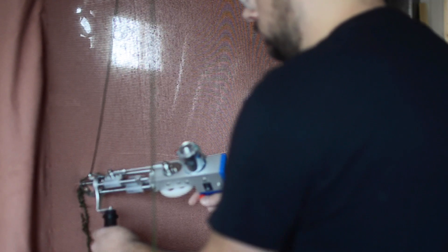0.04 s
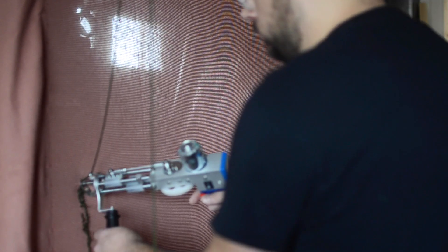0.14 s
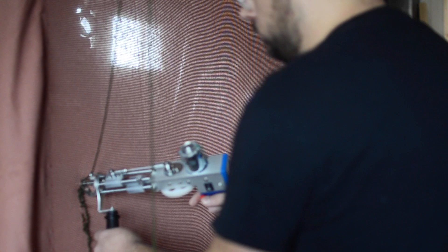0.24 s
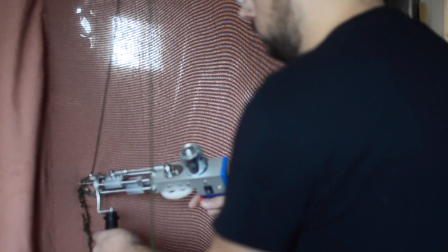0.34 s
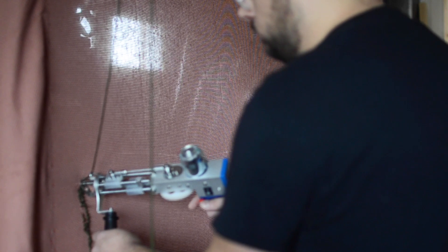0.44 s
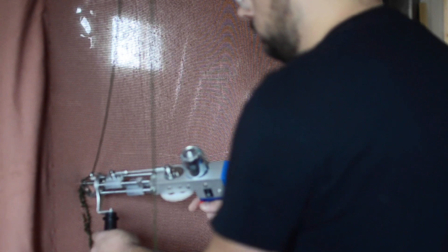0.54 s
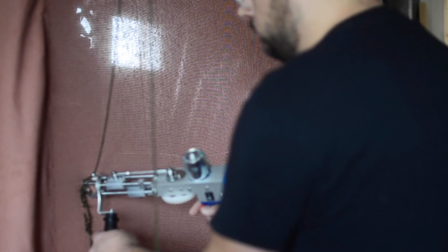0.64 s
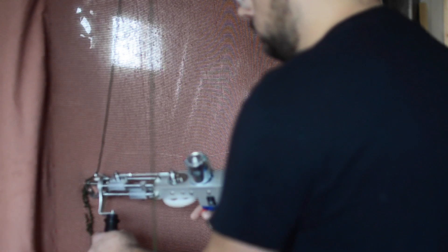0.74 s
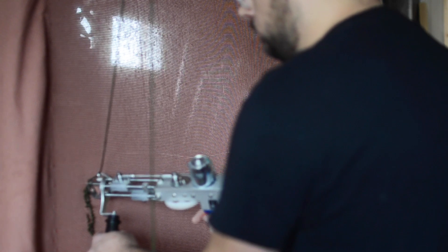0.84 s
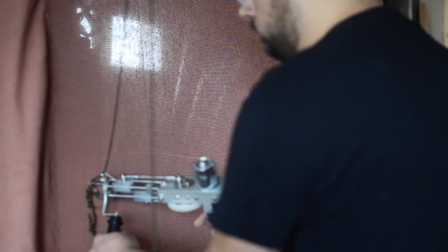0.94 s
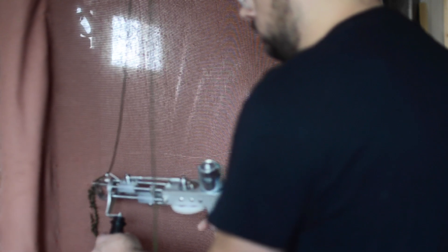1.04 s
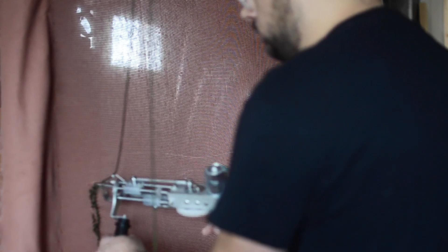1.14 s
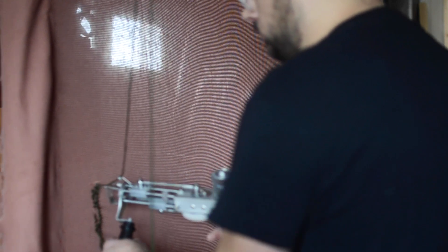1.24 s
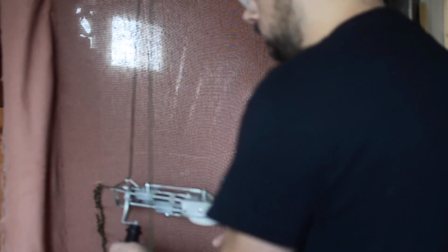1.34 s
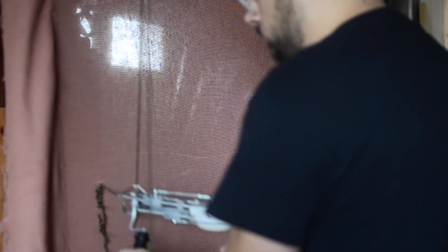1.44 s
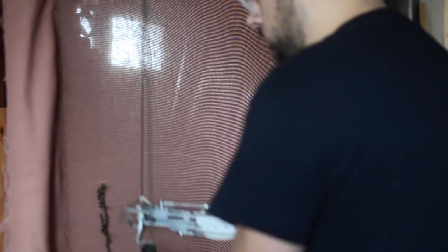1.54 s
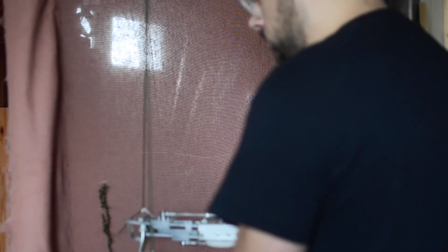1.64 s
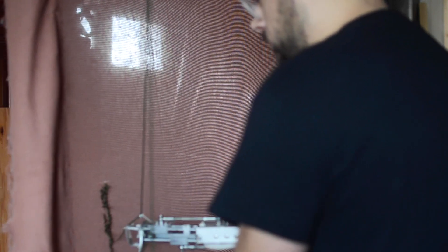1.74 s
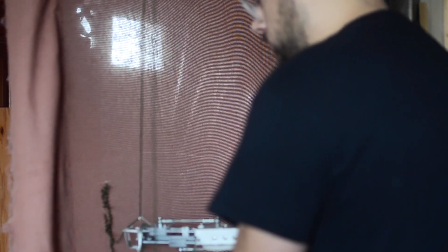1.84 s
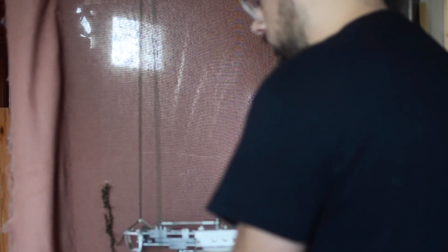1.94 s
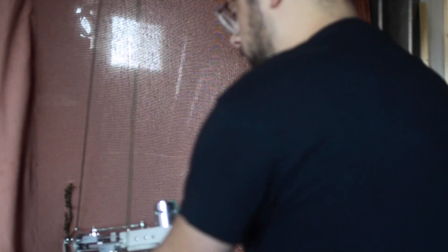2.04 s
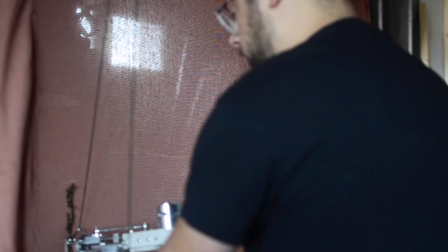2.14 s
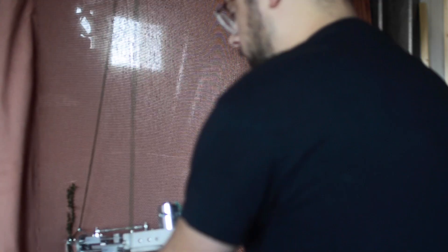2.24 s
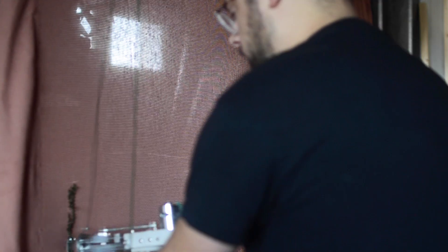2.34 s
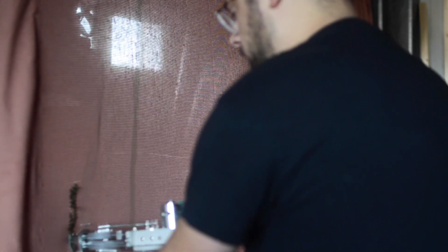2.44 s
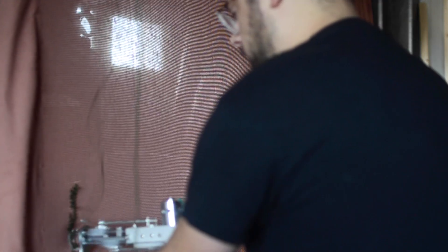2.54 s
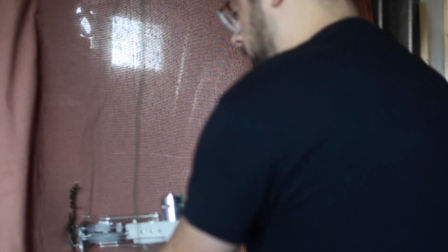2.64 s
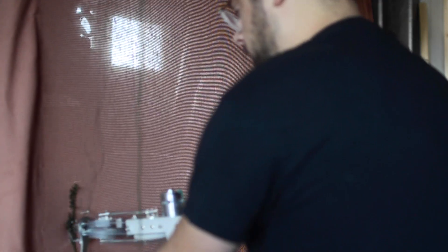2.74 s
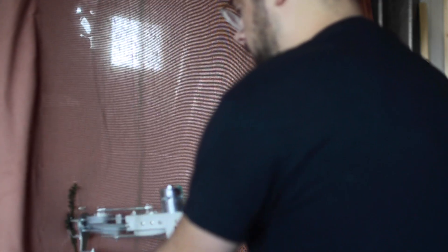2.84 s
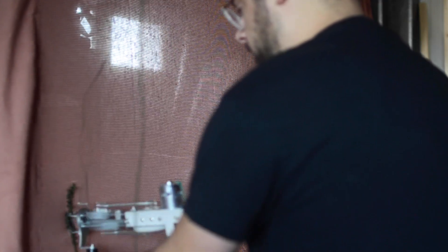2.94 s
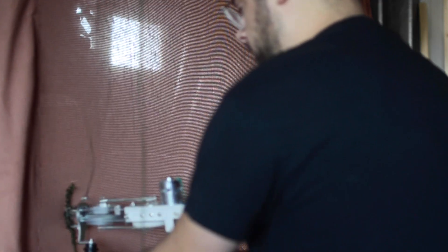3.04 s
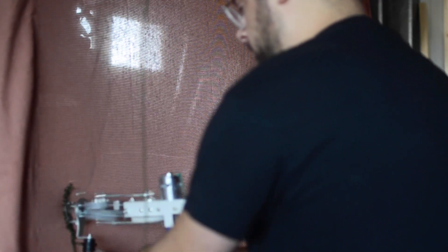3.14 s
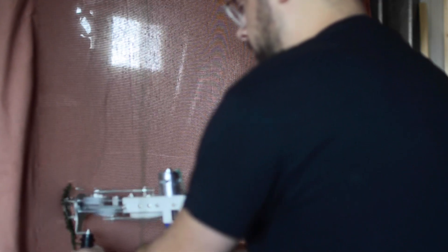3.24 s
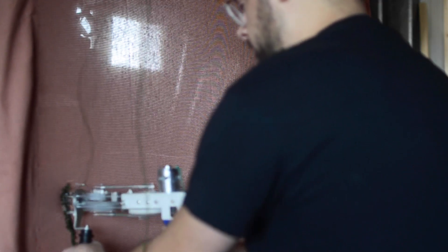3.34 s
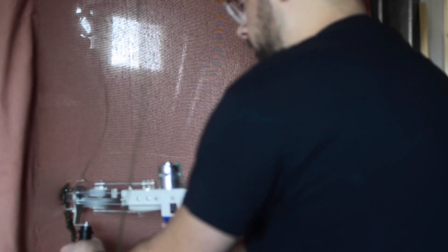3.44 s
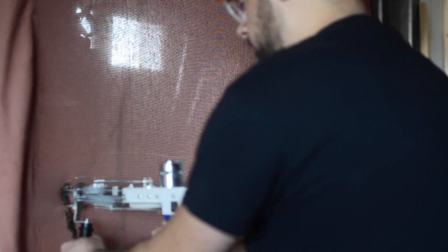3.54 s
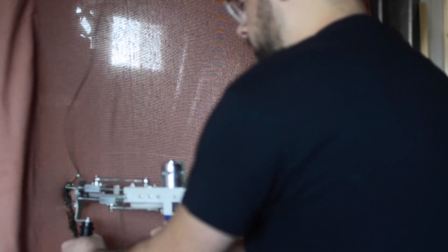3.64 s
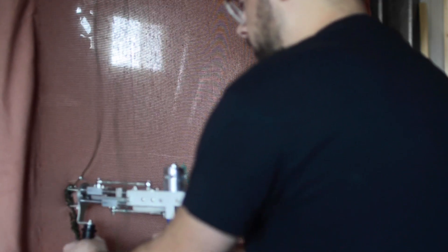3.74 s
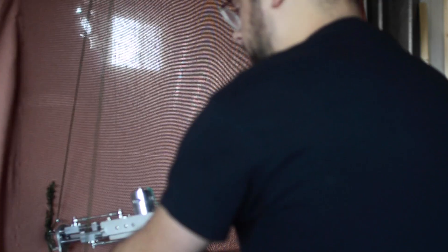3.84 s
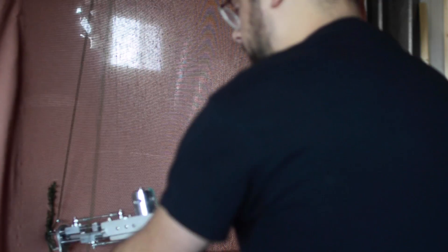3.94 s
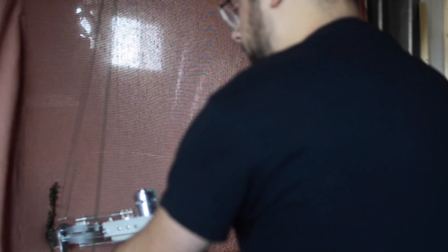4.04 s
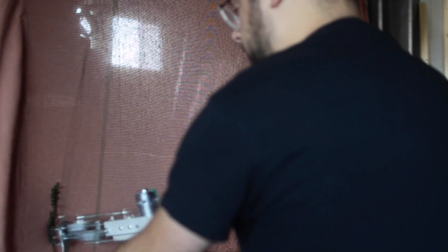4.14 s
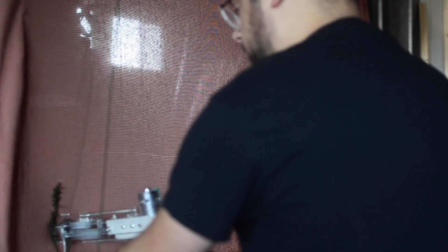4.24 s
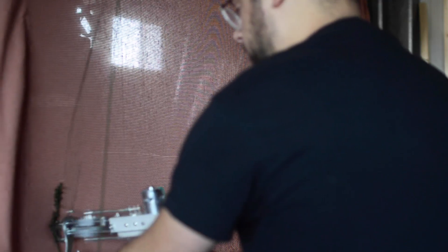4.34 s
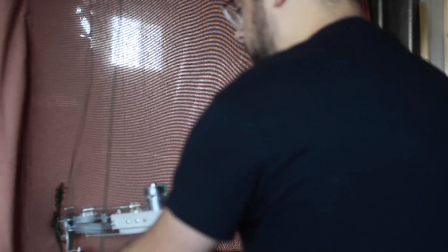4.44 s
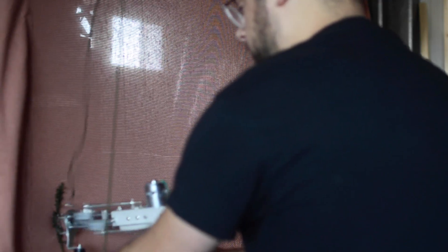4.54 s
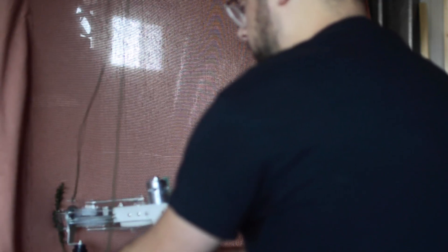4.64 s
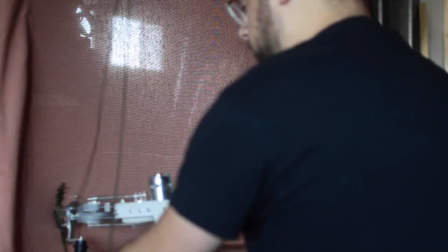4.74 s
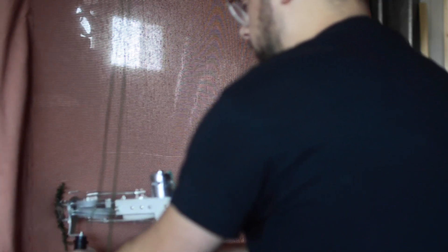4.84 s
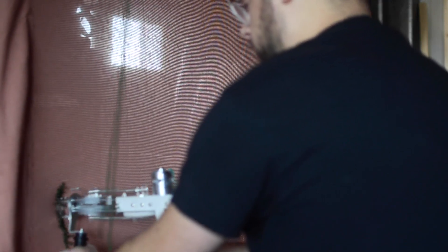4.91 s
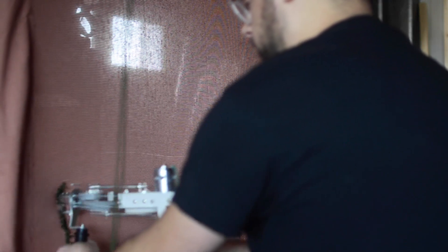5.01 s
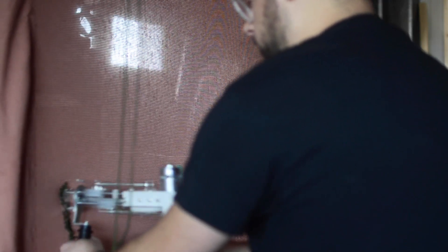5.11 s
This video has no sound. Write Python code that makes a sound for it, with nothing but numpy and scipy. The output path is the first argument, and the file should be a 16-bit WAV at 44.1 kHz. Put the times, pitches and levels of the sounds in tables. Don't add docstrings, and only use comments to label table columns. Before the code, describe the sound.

Quiet room tone with a very faint high electronic whistle. Light knocks, a thin rod ping and a dry click come first. Then a tufting gun starts instantly, chattering about seventeen times a second with bright metal snaps and low cloth thumps. It halts, the cloth settles softly, and a second similar burst follows, uncut at the end. Close, dry sound with short reflections.

```python
import sys
import numpy as np
from scipy import signal
from scipy.fft import rfft, irfft, next_fast_len
from scipy.io import wavfile

SR = 44100
rng = np.random.default_rng(int(sys.argv[2]) if len(sys.argv) > 2 else 0)


def voltage_ratio(decibels):
    exponent = np.asarray(decibels, float) / 20
    return 10 ** exponent


def wav_record(signal):
    frames = np.transpose(np.atleast_2d(signal))
    bounded = np.clip(frames, -1, 1)
    quanta = np.round(bounded * 32767).astype(np.int16)
    wavfile.write(sys.argv[1], SR, quanta)


N = 228155


def rms_one(x):
    return x / np.sqrt(np.mean(x ** 2) + 1e-20)


def in_time(rows):
    s, *columns = np.transpose(rows)
    return [np.interp(np.arange(N) / SR, s, c) for c in columns]


def colour(x, spectrum):
    hz, db = np.transpose(spectrum)
    log_hz = np.log(np.fft.rfftfreq(N, 1 / SR) + 1)
    return irfft(rfft(x) * voltage_ratio(np.interp(log_hz, np.log(hz), db)), N)


def drift(rate_hz):
    r = np.exp(-2 * np.pi * rate_hz / SR)
    wander = signal.lfilter([1], [1, -2 * r, r * r], rng.standard_normal(N + SR))
    return rms_one(wander[SR:])


def high_pass(x, hz):
    return signal.sosfilt(signal.butter(3, hz, "high", fs=SR, output="sos"), x)


def resonance(x, hz, width_hz):
    r = np.exp(-np.pi * width_hz / SR)
    poles = [1, -2 * r * np.cos(2 * np.pi * hz / SR), r * r]
    return signal.lfilter([(1 - r * r) / 2, 0, (r * r - 1) / 2], poles, x)


def lifted(x, peaks):
    return x + sum((voltage_ratio(db) - 1) * resonance(x, hz, width) for hz, width, db in peaks)


def strike(seconds, peak_db, modes, spread_db):
    at = np.clip((np.asarray(seconds) * SR).astype(int), 0, N - 1)
    out = np.zeros(N)
    chance = rng.standard_normal((len(at), len(modes)))
    for k, (hz, db, t60) in enumerate(modes):
        clicks = np.bincount(at, voltage_ratio(peak_db + db + spread_db * chance[:, k]), N) + 1e-18
        r, w = voltage_ratio(-60 / (t60 * SR)), 2 * np.pi * hz / SR
        out += signal.lfilter([0, (-1) ** k * np.sin(w)], [1, -2 * r * np.cos(w), r * r], clicks)
    return out


# f/Hz, level/dB [dB per Hz]
AIR_SPECTRUM = [(20, -21), (85, -8.5), (125, -14.5), (182, -13), (260, -7.5), (500, -3), (820, -0.5),
                (1120, -8), (1500, -6.5), (2200, -18), (3400, -19.5), (4300, -29), (6500, -44),
                (15000, -48)]
# f/Hz, width/Hz, level/dB
ROOM_MODES = [(98.2, 9.4, 11), (182.5, 12.7, 12.5), (421, 7.8, 10), (583, 22, 4.5), (730.5, 21.4, 9.5),
              (846.5, 22.3, 10.5), (967, 12, 7)]
# t/s, level/dB
AIR_LEVEL = [(0.0, -41), (5.17, -40)]


def hum():
    air = rms_one(lifted(colour(rng.standard_normal(N), AIR_SPECTRUM), ROOM_MODES))
    t = np.arange(N) / SR
    flips = np.tanh(12 * np.sin(np.pi * 59 * t + 1.4))
    whistle = np.sqrt(2) * voltage_ratio(-69) * flips * np.sin(2 * np.pi * 15000.5 * t)
    return voltage_ratio(in_time(AIR_LEVEL)[0] + drift(12.0)) * air + whistle


# t/s, knock level/dB, ping level/dB, tick level/dB, scuff level/dB
TOUCHES = [(.551, -51, -80, -83, -64), (1.258, -42, -39, -75, -50), (1.297, -60, -44, -85, -60),
           (1.595, -27.5, -54, -51, -41.5), (1.772, -56, -29, -62, -45), (1.81, -70, -33, -85, -62),
           (2.09, -64, -48, -84, -51), (2.364, -26, -62, -27.5, -36), (3.79, -70, -46, -90, -65),
           (3.909, -72, -83, -51, -68), (4.024, -34, -60, -19.5, -46)]
# f/Hz, level/dB, t60/s
KNOCK_MODES = [(435, -7, 0.088), (623, -7.5, 0.082), (690, -1, 0.064), (838, 6.5, 0.044), (947, 1.5, 0.061),
               (1360, -18, 0.038), (1680, -7, 0.048), (2380, -12, 0.025)]
# f/Hz, level/dB, t60/s
PING_MODES = [(2300, -12, 0.035), (2900, -14, 0.035), (3500, -10, 0.17), (3470, -3.5, 0.13),
              (3820, -19, 0.05)]
# f/Hz, level/dB, t60/s
TICK_MODES = [(1480, 8.5, 0.0056), (2530, 3, 0.013), (3600, -5, 0.0077), (5300, -5, .005), (6900, -8, .004),
              (9450, -29, .003), (13000, -19, 0.0027)]
# t/s, level/dB
YARN_RUB = [
    (2.1, -110),
    (2.112, -73),
    (2.17, -71),
    (2.19, -110),
]
# t/s, level/dB
FRAME_BUMPS = [
    (4.4745, -13.5),
    (4.48, -15.5),
    (4.483, -18.5),
    (4.492, -21),
    (4.509, -35),
    (4.526, -27),
]
# f/Hz, level/dB, t60/s
FRAME_MODES = [(190, -8, .04), (270, -6, .035), (380, -5, .03), (540, -3, .03), (780, 2, .045),
               (1000, -4, .025), (1300, -8, .02), (1750, -11, .02)]


def handling():
    s, knock_db, ping_db, tick_db, scuff_db = np.transpose(TOUCHES)
    fade = voltage_ratio(-60 / (.16 * SR))
    touches = np.bincount((s * SR).astype(int), voltage_ratio(scuff_db), N) + 1e-18
    scuffs = signal.lfilter([1], [1, -fade], touches) * rng.standard_normal(N)
    knocks = strike(s, knock_db, KNOCK_MODES, spread_db=1)
    pings = strike(s, ping_db, PING_MODES, spread_db=1)
    band = signal.butter(3, [380, 4600], "band", fs=SR, output="sos")
    soft = signal.sosfilt(band, knocks + pings + scuffs)
    fibres = resonance(resonance(rng.standard_normal(N), 4800, 3000), 4800, 3000)
    rub = fibres * voltage_ratio(in_time(YARN_RUB)[0] + 17.0)
    ticks = strike(s, tick_db, TICK_MODES, spread_db=2)
    bumps = strike(*np.transpose(FRAME_BUMPS), FRAME_MODES, spread_db=2)
    return soft + ticks + rub + bumps


def room(x):
    size = next_fast_len(N + SR)
    hz = np.fft.rfftfreq(size, 1 / SR)
    t60_s = 0.35 / (1 + hz / 5800)
    echoes = 0
    for k, lag_s in enumerate(rng.uniform(.008, .033, size=10)):
        one_round = voltage_ratio(-60 * lag_s / t60_s) * np.exp(-2j * np.pi * hz * lag_s)
        echoes = echoes + (-1) ** k * one_round / (1 - one_round)
    return irfft(rfft(x, size) * echoes, size)[:N]


# pressed t/s, released t/s, crank rest angle/turns, speed/(turns/s), creep/(turns/s per s)
PULLS = [
    (2.362, 3.63, .653, 16.916, .402),
    (4.024, 5.3, .743, 17.031, .651),
]


def motor():
    t = np.arange(N) / SR
    speed, turns, torque_db = np.zeros(N), np.zeros(N), np.zeros(N)
    drive_db, snaps = np.full(N, -90.), []
    for pressed, released, angle, full, creep in PULLS:
        on = t >= pressed
        since, coasting = t[on] - pressed, np.maximum(t[on] - released, 0)
        lacking = np.exp(-since / .03)
        braked = 1250 * coasting ** 2
        speed[on] = np.maximum(full * (1 - lacking) + creep * since - braked, 0)
        turns[on] = angle + np.cumsum(speed[on]) / SR
        fade_db = np.minimum(15000 * np.maximum(coasting - .034, 0) ** 2, 90)
        switch_db = -20 * np.maximum(1 - since / .003, 0)
        drive_db[on] = 1.5 - 8.5 * lacking + switch_db - fade_db
        torque_db[on] = 11 * np.minimum(2.8 * lacking, 1) - np.minimum(.7 * fade_db, 16)
        whole_turn = np.diff(np.floor(turns[on]), prepend=0) > 0
        snaps += list(t[on][whole_turn & (coasting < .03)])
    return speed, turns, drive_db, torque_db, np.array(snaps)


LOAD_PEAKS = [
    (.28, .08),
    (.87, .075),
]
# multiple of tooth rate, level/dB, first load lift/dB, second load lift/dB, share of torque
TOOTH_HARMONICS = [(1, -42.5, 7.5, 12, -0.22), (2, -35, 13, 9, 0.92), (3, -40.5, 9, 8.5, -0.54),
                   (4, -36.5, 5.5, 9, 0.47), (5, -44.5, 6, 0, -1.9), (8, -46, -19, -10, 0.54)]
# f/Hz, level/dB [dB per Hz]
RATTLE_SPECTRUM = [(350, -37), (650, -12.5), (820, -7), (1100, -11), (1700, -10), (2050, -9.5),
                   (2500, -8.5), (3450, -6.5), (3800, -11.5), (4700, -14.5), (6900, -22), (7500, -29.5),
                   (11500, -42), (15500, -52)]
# f/Hz, width/Hz, level/dB
HOUSING_MODES = [(810.7, 52.5, 13.5), (1218, 19, 9.5), (1660, 560, 1.5), (2128, 11.5, 8.5), (2424, 69, 10),
                 (3560, 120, 2.5), (4220, 105, 6), (13700, 400, 8)]


def gears(turns, torque_db):
    loads = []
    for at, width in LOAD_PEAKS:
        offset = (turns - at + .5) % 1 - .5
        loads.append(np.exp(-.5 * (offset / width) ** 2))
    sag = .001 * np.sin(2 * np.pi * (turns - .3)) + .002 * np.sin(4 * np.pi * (turns - .17))
    tooth = 2 * np.pi * 49 * (turns + sag) + 0.19 * drift(35)
    slack = np.clip(1 - torque_db / 12, .2, 1)
    whine = 0
    for k, db, first, second, share in TOOTH_HARMONICS:
        waver_db, slip = 2.5 * drift(30), .3 * drift(35)
        swell_db = slack * (first * loads[0] + second * loads[1] + waver_db)
        level = voltage_ratio(db + share * torque_db + 7.0 * (1 - slack) + swell_db)
        whine = whine + level * np.sin(k * tooth + slip)
    whine = high_pass(whine, 650)
    gate = np.exp(0.5 * np.cos(tooth)) * voltage_ratio(2.0 * loads[0] + 4.1 * loads[1])
    rattle = rms_one(colour(gate * rng.standard_normal(N), RATTLE_SPECTRUM))
    return lifted(whine + voltage_ratio(-26) * rattle, HOUSING_MODES)


# f/Hz, level/dB [dB per Hz]
CLOTH_SPECTRUM = [(20, -4), (60, -7.5), (130, 1.5), (220, -0.5), (340, 2.5), (550, 3), (800, -24.5)]


def cloth(speed):
    rumble = rms_one(colour(rng.standard_normal(N), CLOTH_SPECTRUM))
    return voltage_ratio(-41 + 1.95 * drift(20.6)) * (speed / 17) ** 4 * rumble


def slide(turns):
    bright = high_pass(rng.standard_normal(N), 7500)
    hiss = rms_one(lifted(bright, [(13300, 700, 9.0), (9000, 810, 5.8)]))
    return voltage_ratio(-41 - 35.0 * (turns % 1)) * hiss


# f/Hz, level/dB, t60/s
CUTTER_MODES = [(6590, 2.5, 0.004), (8500, 3, 0.0023), (10660, 1, 0.002), (13140, -6, 0.0054),
                (14600, -3.5, .004)]


def loose(drive_db):
    at = np.flatnonzero(rng.random(N) < 220 / SR)
    extra_db = 3 * np.minimum(rng.exponential(1, len(at)), 3)
    return strike(at / SR, drive_db[at] - 47 + extra_db, CUTTER_MODES, spread_db=4)


# lag/ms, level/dB, dullness (0-1)
BLADE_CONTACTS = [
    (.9, -1, .3),
    (2.0, -7, .3),
    (5.3, -9, .8),
    (12.5, -24, .2),
    (26, -22, .1),
]
# t/s, snap peak level/dB
YARN_PRESSURE = [(2.4, -9.5), (3.0, -10.5), (3.65, -9.5), (4.05, -9.5), (4.4, -9.5), (4.9, -8.5),
                 (5.17, -8)]


def cutter(snaps):
    snap_db = np.interp(snaps, *np.transpose(YARN_PRESSURE)) + 1.6 * rng.standard_normal(len(snaps))
    octaves = np.log2(np.array(CUTTER_MODES)[:, 0] / 6500)
    out = 0
    for lag_ms, db, dull in BLADE_CONTACTS:
        modes = np.array(CUTTER_MODES)
        modes[:, 1] -= 12 * dull * octaves
        out = out + strike(snaps + lag_ms / 1000, snap_db + db - 5.0, modes, spread_db=1.4)
    return out


# t/s, level/dB
CLOTH_SETTLING = [
    (3.705, -11),
    (3.735, -14),
    (3.771, -11),
    (3.82, -20),
]


def thump(snaps, speed):
    at = np.minimum(((snaps + .012) * SR).astype(int), N - 1)
    push = np.bincount(at, (speed[at] / 17) ** 3 * voltage_ratio(0.46 * rng.standard_normal(len(at))), N)
    push += voltage_ratio(-23) * np.roll(push, round(0.0259 * SR))
    settle_s, settle_db = np.transpose(CLOTH_SETTLING)
    push += np.bincount((settle_s * SR).astype(int), voltage_ratio(settle_db), N)
    t = np.arange(-SR // 25, SR // 25 + 1) / SR
    swing = np.cos(2 * np.pi * 74 * t) * np.exp(-.5 * (1000 * t / 6) ** 2)
    return voltage_ratio(-43) * rms_one(lifted(signal.fftconvolve(push, swing, "same"), [(87, 11, 3.4)]))


def scene():
    background, touches = hum(), handling()
    speed, turns, drive_db, torque_db, snaps = motor()
    running = voltage_ratio(drive_db) * (gears(turns, torque_db) + cloth(speed) + slide(turns))
    near = touches + running + loose(drive_db) + cutter(snaps)
    return (near + voltage_ratio(-16) * room(near) + thump(snaps, speed) + background)[None]


def roll_off(x):
    return signal.sosfilt(signal.butter(12, 16010, fs=SR, output="sos"), x)


def record(dry):
    hissy = dry + voltage_ratio(-72.5) * rng.standard_normal(dry.shape)
    top_cut = signal.ellip(10, .5, 60, 15880, fs=SR, output="sos")
    return roll_off(signal.sosfilt(top_cut, hissy))


dry = scene()
out = record(dry)
wav_record(out)
```